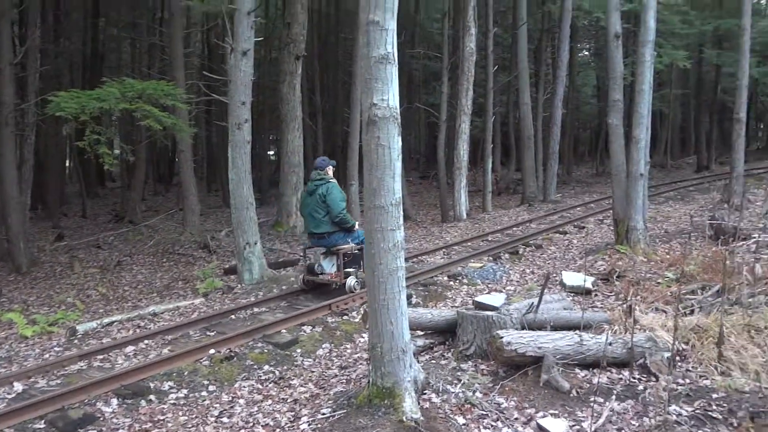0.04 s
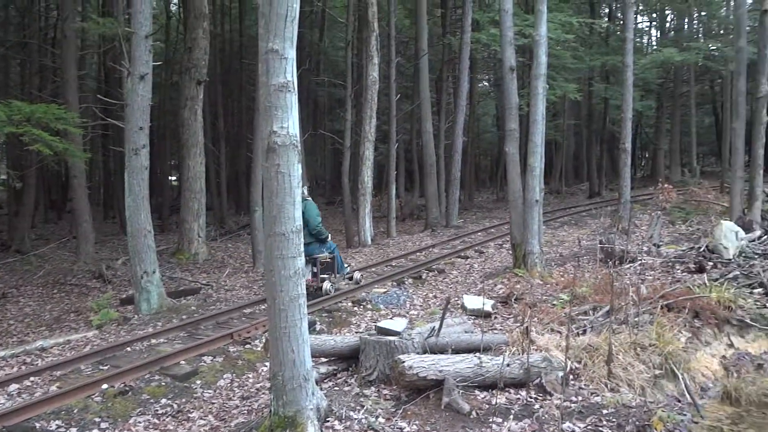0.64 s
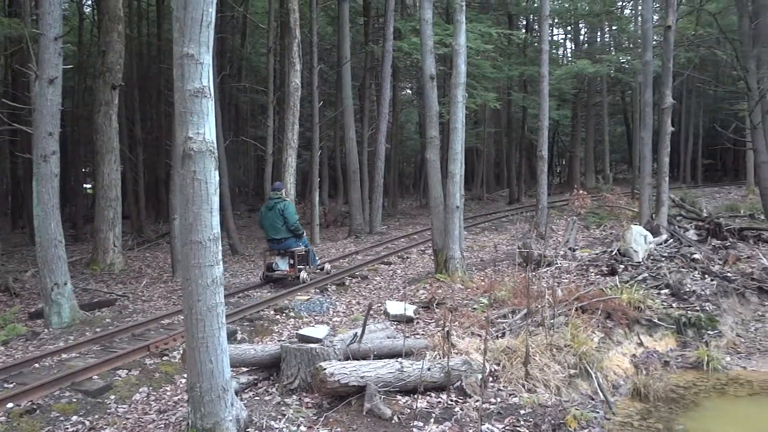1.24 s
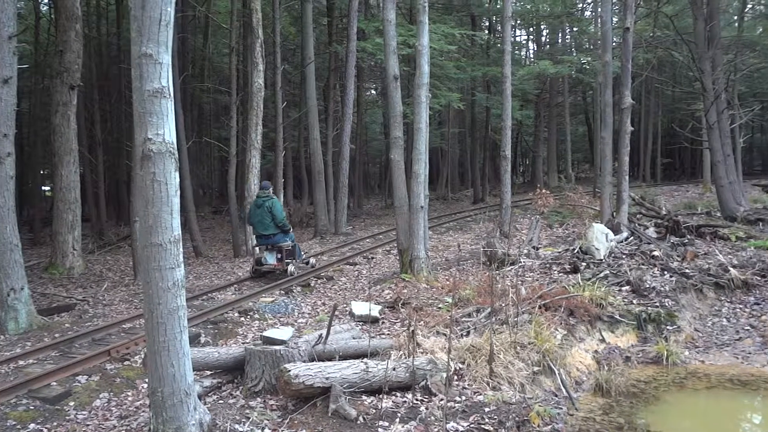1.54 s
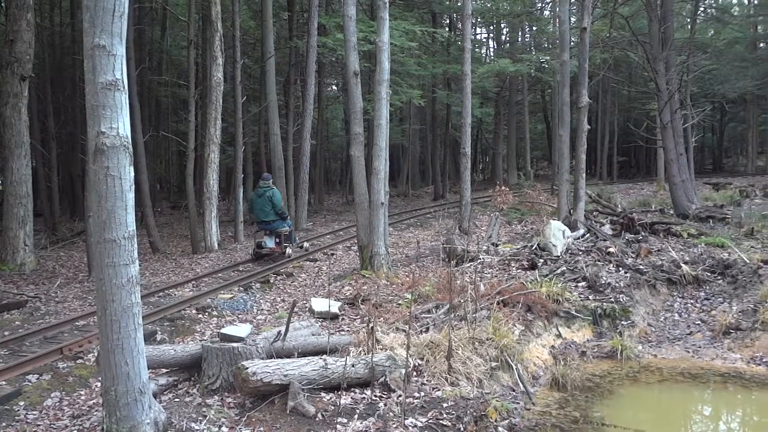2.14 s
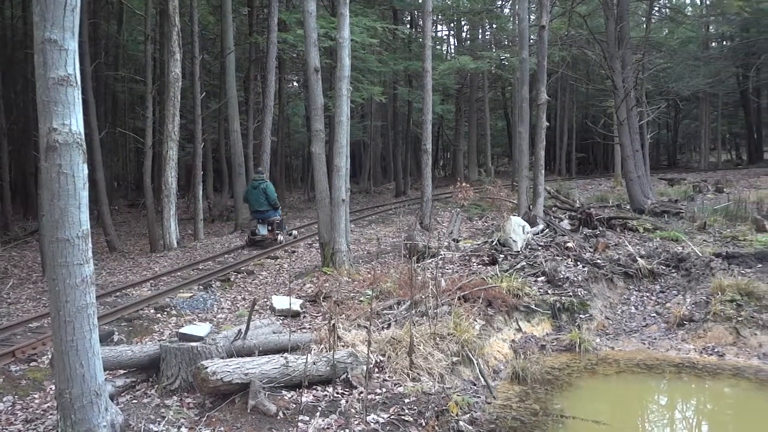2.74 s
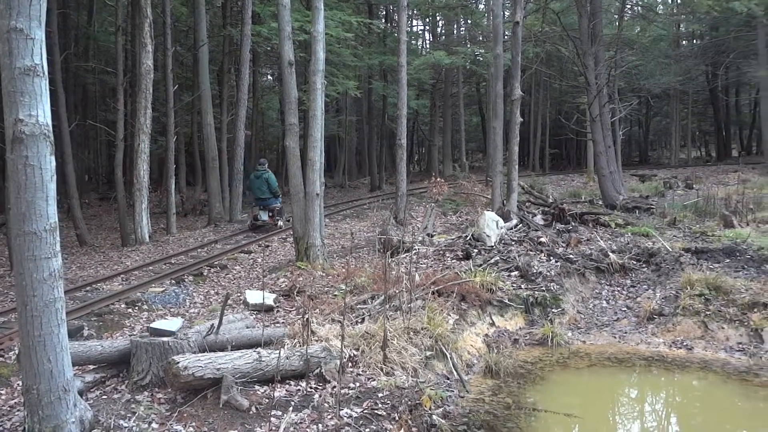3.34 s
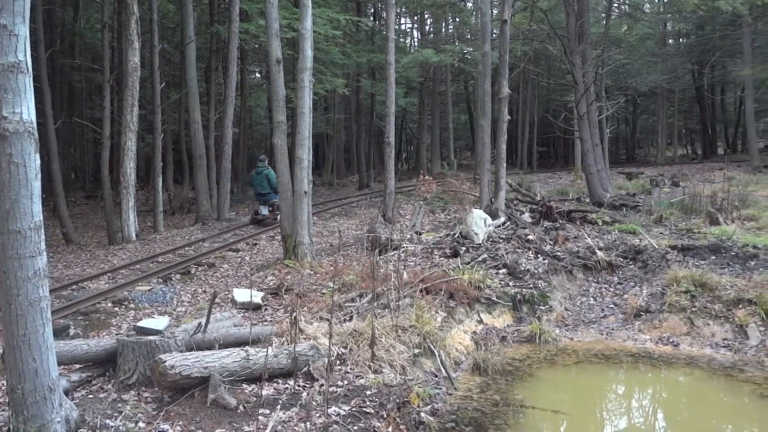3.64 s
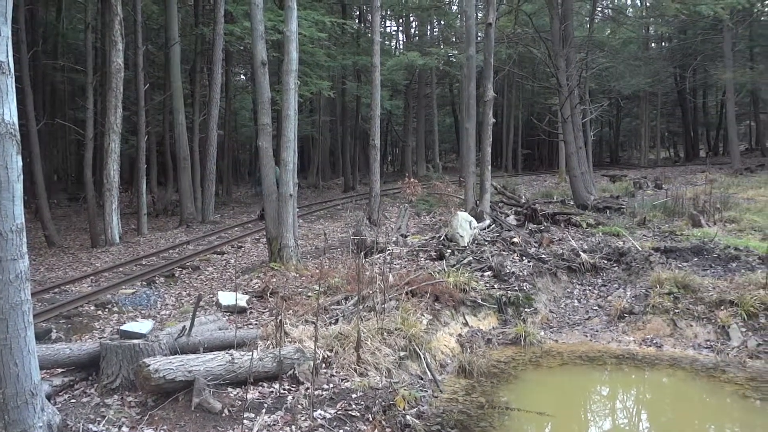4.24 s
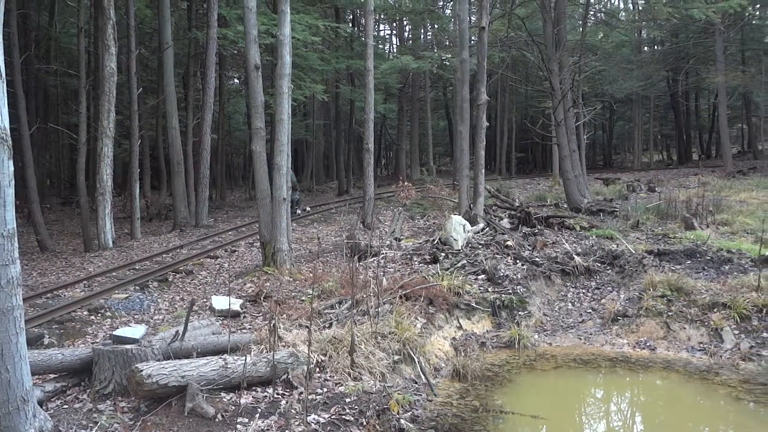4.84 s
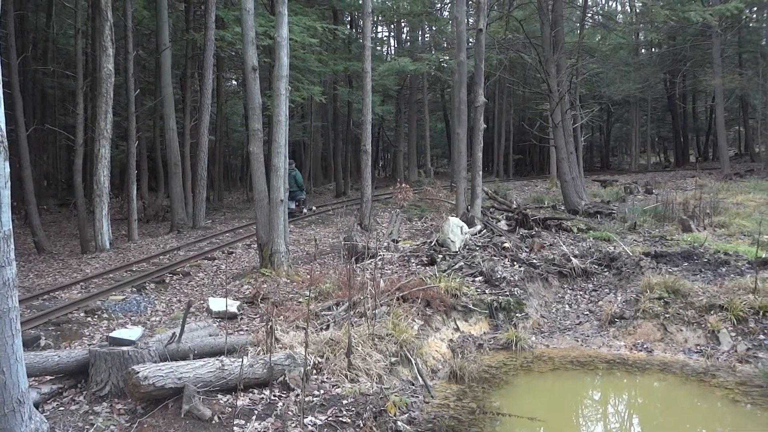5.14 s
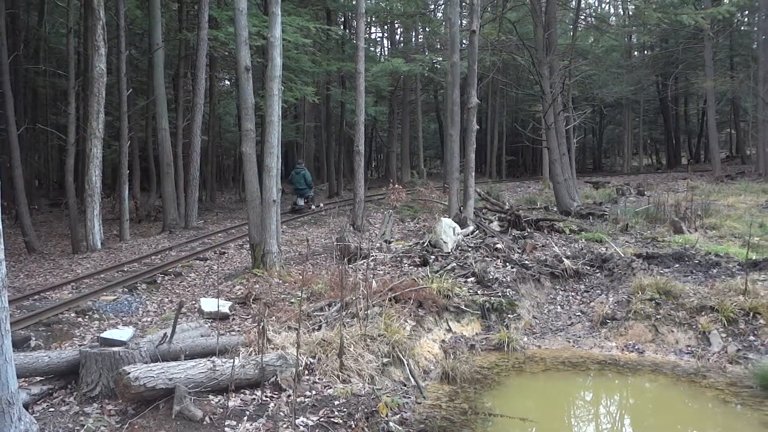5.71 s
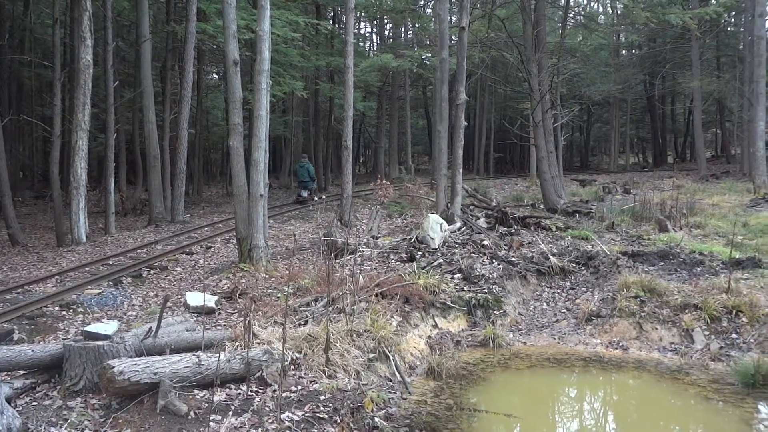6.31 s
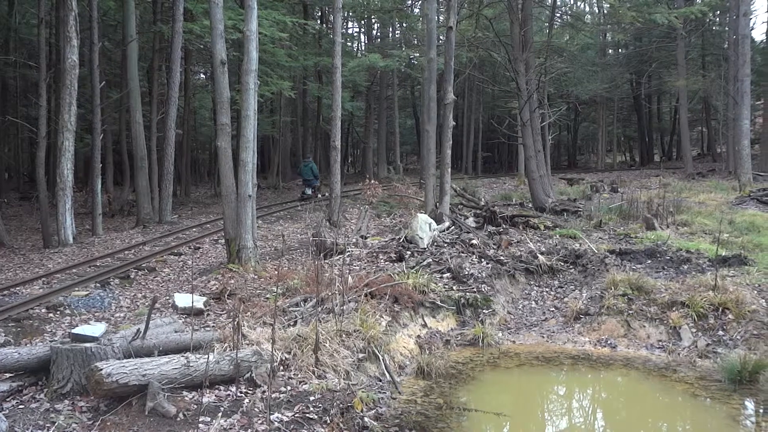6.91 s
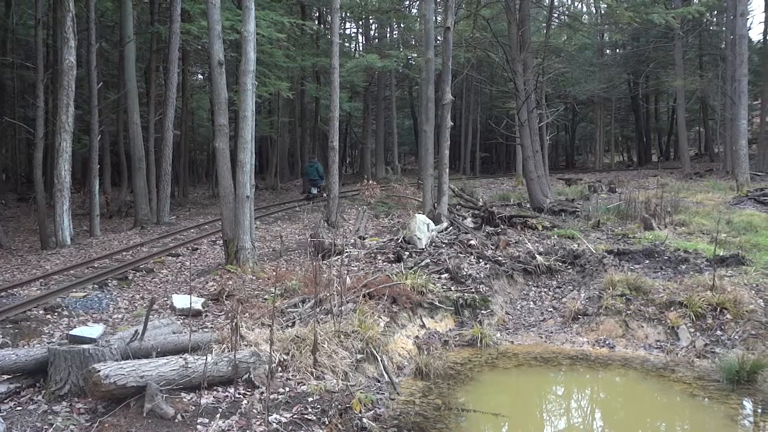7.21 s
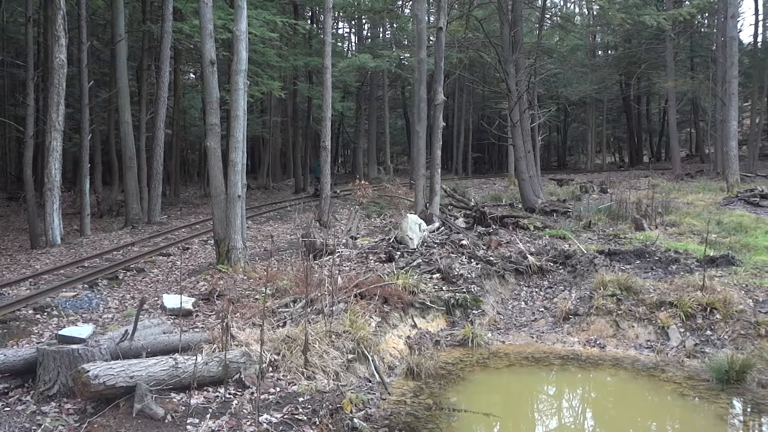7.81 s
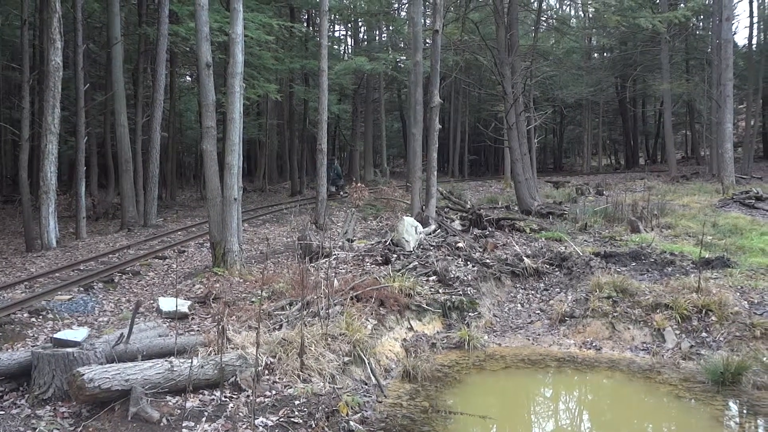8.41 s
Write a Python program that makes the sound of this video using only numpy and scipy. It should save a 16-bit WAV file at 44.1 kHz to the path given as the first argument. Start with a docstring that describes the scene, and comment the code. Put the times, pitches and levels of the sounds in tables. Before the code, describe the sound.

A small cart rolls away along a narrow steel track in quiet woods, its ringing rumble fading as the wheels clack over rail joints.

```python
"""In a wood, a two-port microphone stands 5 m beside a narrow track as a small ride-on cart rolls away.
Rough steel treads make rails, deck and wheels roar and ring. Each rail joint knocks through the steel
first and clatters through the air after it. Pits bump the wheels, the flanges rub in the bend and
loose parts tick; the trunks scatter knocks, clatter and ticks back through the still air."""
import sys
import numpy as np
from scipy import signal
from scipy.fft import rfft, irfft
from scipy.io import wavfile

SR = 44100
rng = np.random.default_rng(int(sys.argv[2]) if len(sys.argv) > 2 else 0)


def inscribe(sig):
    """Save sig as 16-bit PCM at rate SR to the path in sys.argv[1].

    A 1-D sig is mono; a 2-D sig holds one channel per row.
    Samples are clipped to [-1, 1] before scaling.
    """
    pcm = np.round(np.clip(np.atleast_2d(sig).T, -1, 1) * 32767)
    wavfile.write(sys.argv[1], SR, pcm.astype(np.int16))


N = 377496
TIME = np.arange(N) / SR


def from_db(db):
    """Decibels to gain."""
    return 10 ** (np.asarray(db) / 20)

def rms_one(x):
    """Scale to unit power."""
    return x / np.sqrt(np.mean(x ** 2) + 1e-20)

def in_time(points):
    """A table over time, read at every sample."""
    return np.interp(TIME, *np.transpose(points))

def per_bin(points):
    """A table over log frequency, read at every spectral bin."""
    hz, value = np.transpose(points)
    return np.interp(np.log(np.fft.rfftfreq(N, 1 / SR) + 1), np.log(hz), value)

def passage(start, end, edge_s):
    """Rises to 1 around start, holds, and falls around end."""
    return np.clip(np.minimum(TIME - start, end - TIME) / edge_s + .5, 0, 1)

def add(out, s, sound):
    """Mix a sound in at time s."""
    at = max(round(s * SR), 0)
    out[at:at + len(sound)] += sound[:N - at]

def drift(per_s, hop=40):
    """A smooth random curve of spread 1, changing about per_s times a second."""
    pole = np.exp(-2 * np.pi * per_s * hop / SR)
    noise = rng.standard_normal(N // hop + 2002)
    slow = signal.lfilter([1], [1, -2 * pole, pole * pole], noise)[2000:]
    return np.interp(np.arange(N) / hop, np.arange(len(slow)), rms_one(slow))

def low_pass(x, hz, order=2):
    """Dull the treble."""
    return signal.sosfilt(signal.butter(order, min(hz, .45 * SR), fs=SR, output="sos"), x)

def resonate(x, hz, width):
    """A steep resonance: two equal resonators in series, gain 1 on top."""
    radius = np.exp(-np.pi * width / SR)
    gain = (1 - radius ** 2) / 2
    section = [gain, 0, -gain, 1, -2 * radius * np.cos(2 * np.pi * hz / SR), radius ** 2]
    return signal.sosfilt([section] * 2, x + 1e-18)

def rubbed(modes, force):
    """Countless tiny contacts under a common force; each mode picks up its own share of them."""
    return sum(from_db(db) * resonate(force * rng.standard_normal(len(force)), hz, width)
               for hz, width, db in modes)

def wandering(modes, force, waver_db, per_s):
    """The contact wanders over the tread, so each mode swells by itself; unit power."""
    return rms_one(sum(rubbed([mode], force * from_db(waver_db * drift(per_s))) for mode in modes))

def gliding(x, pitch_share, per_s):
    """As the load and the contact point shift, the resonances slide slightly up and down."""
    at = np.arange(N)
    return np.interp((at + np.cumsum(pitch_share * drift(per_s))) % N, at, x)

def jolt(modes, length_s, damping=0.0, uneven_db=0.0, attack_s=.0004, bounces_per_s=130):
    """A burst of contacts, unit power over length_s; damping makes the high modes die first."""
    t = np.arange(SR // 2) / SR
    bounces = from_db(uneven_db * np.clip(drift(bounces_per_s)[:len(t)], -2, 2))
    swell = (1 - np.exp(-t / attack_s)) * bounces
    burst = np.zeros(len(t))
    for hz, width, db in modes:
        decay = np.exp(-(t / length_s * (hz / 1000) ** damping) ** 2)
        burst += rubbed([(hz, width, db)], swell * decay)
    return burst / np.sqrt(np.sum(burst ** 2) / (length_s * SR))


# still air around the microphone: (frequency [Hz], relative density [dB])
AIR_SPECTRUM = [(20, -5), (45, 0), (80, 4.5), (150, 4), (250, 5), (500, 9), (1500, -2), (3000, 3.5),
                (6000, -5), (11000, -10)]
def still_air(level_db=-61):
    """The wood's faint, steady hush."""
    spectrum = rfft(rng.standard_normal(N)) * from_db(per_bin(AIR_SPECTRUM))
    return from_db(level_db) * rms_one(irfft(spectrum, N))

def trunk_echoes(x, t60_s=0.99, build_s=0.0016, leaves_hz=4500, uneven_db=5.0):
    """Trunks return a swarm of echoes of uneven size, dulled by the foliage."""
    t = np.arange(SR) / SR
    swarm = rng.standard_normal(SR) * from_db(uneven_db * rng.standard_normal(SR))
    envelope = (1 - np.exp(-t / build_s)) * from_db(-60 * t / t60_s)
    echoes = low_pass(swarm * envelope, leaves_hz)
    return signal.fftconvolve(x, echoes / np.sqrt(np.sum(echoes ** 2)))[:N]

# phase between the microphone's ports: (frequency [Hz], left lead [rad])
LEFT_LEAD = [(0, 0), (340, 0.7), (1640, 0.96), (2150, 0.93), (2930, 0.72), (4050, 0.21), (5430, 0.66),
             (8350, 0.5), (11000, -0.0), (11800, 0.4)]
# their balance: (frequency [Hz], left over right [dB])
LEFT_LEVEL = [(100, -0.5), (350, 3), (620, 2.5), (1120, .5), (2010, 2.5), (3620, -1.5), (6500, 1.5),
              (11000, 0.5)]
# how alike they sound: (frequency [Hz], coherence [0..1])
COHERENCE = [(120, .82), (300, .96), (600, .99), (1200, .985), (2500, .89), (4500, .93), (10000, .88)]
def microphone(x):
    """Two close ports hear one sound with a shift of phase and level, plus a diffuse share."""
    sides = np.array([[1], [-1]])
    port = from_db(sides * per_bin(LEFT_LEVEL) / 2) * np.exp(sides * .5j * per_bin(LEFT_LEAD))
    direct = rfft(x) * port / np.abs(port.mean(axis=0))
    diffuse = rfft(trunk_echoes(x, t60_s=.35, build_s=.002, leaves_hz=15000))
    alike = per_bin(COHERENCE)
    return irfft(direct + sides * diffuse * np.sqrt((1 - alike) / (1 + alike)), N)

def along_track(s, start_m=0.6, speed_m_per_s=1.85):
    """Metres of rail between the microphone's spot and the cart, which keeps a steady pace."""
    return start_m + speed_m_per_s * s

def distance_db(trackside_m=5.0):
    """Level relative to the start, falling inversely with the way to the track plus the way along it."""
    return -20 * np.log10((trackside_m + along_track(TIME)) / (trackside_m + along_track(0)))

# frame (low) and wheel (high) tones: (start [s], end [s], frequency [Hz], width [Hz], level [dB])
SUNG_TONES = [(3.35, 5.7, 288, 13, -65.5), (1.9, 4.0, 3365, 60, -63), (4.0, 4.5, 3200, 70, -60),
              (4.5, 6.3, 3171, 55, -68.5), (7.8, 8.5, 3190, 55, -70)]
def singing():
    """For a stretch, rolling keeps one lightly damped mode ringing as a faint, unsteady tone."""
    out = np.zeros(N)
    for start, end, hz, width, db in SUNG_TONES:
        tone = wandering([(hz, width, 0)], np.ones(N), waver_db=3.0, per_s=4)
        out += from_db(db) * passage(start, end, edge_s=.2) * tone
    return out

# flange against rail: (frequency [Hz], width [Hz], level [dB])
FLANGE_RESONANCES = [(3750, 250, 0), (4414, 130, 11), (4850, 240, 5.5), (5175, 150, 9), (5500, 220, 0),
                     (6740, 300, -19), (7440, 800, -9), (9450, 810, -17)]
def flange(level_db=-56, waver_db=2.0):
    """Down the track, in the bend, the flange scrapes the rail with a ringing hiss."""
    bend = passage(5.73, 7.16, edge_s=0.47)
    pressure = from_db(waver_db * drift(per_s=25))
    return from_db(level_db) * bend * rms_one(rubbed(FLANGE_RESONANCES, pressure))

# short snaps: loose parts on the cart, a wheel's small rebound just after the first knock, and a high ring
# ending the last joint's clatter: (time [s], level [dB], frequency [Hz], length [s])
SHORT_SNAPS = [(0.138, -30, 1520, 0.0056), (0.158, -36, 3600, 0.0074), (0.219, -41, 4800, 0.0045),
               (0.391, -39, 4950, 0.0037), (1.469, -43, 4240, 0.0051), (2.014, -38.5, 4700, 0.0037),
               (3.113, -49, 5500, 0.0037), (3.613, -49, 2400, 0.038), (4.407, -41, 3780, 0.0045),
               (5.793, -37, 2380, 0.0031), (5.796, -45, 6760, 0.0021), (6.014, -37.5, 7640, 0.0019),
               (6.174, -49.5, 5500, .004), (7.774, -41, 7540, 0.0017), (8.33, -52.5, 7850, 0.042)]
def ticks(relative_width=0.78):
    """Short dry snaps, each with its own pitch: mostly loose parts, plus a wheel's rebound and a clatter's last
    ring."""
    out = np.zeros(N)
    for s, db, hz, length_s in SHORT_SNAPS:
        add(out, s, from_db(db) * jolt([(hz, relative_width * hz, 0)], length_s))
    return out

# pits along the rail: (time [s], peak level [dB])
RAIL_PITS = [(0.505, -14.5), (1.319, -16), (2.784, -17.5), (3.559, -17.5), (4.416, -22), (4.614, -18),
             (5.036, -18.5), (5.434, -22), (5.915, -22), (7.790, -22)]
def pits():
    """A wheel drops into a pit in the rail: one soft push, a short bump."""
    ring = resonate(signal.unit_impulse(SR // 10), hz=880, width=170)
    bump = low_pass(ring, hz=1700, order=4)
    out = np.zeros(N)
    for s, db in RAIL_PITS:
        add(out, s, from_db(db) * bump / np.abs(bump).max())
    return out

# the deck's boom: (frequency [Hz], width [Hz], level [dB])
BOOM_RESONANCES = [(301, 43, -0.5), (358.6, 120, -1.5)]
# its course, heard from the trackside: (time [s], level [dB])
BOOM_LEVEL = [(0, -49), (0.6, -55), (1.1, -60), (1.7, -57.5), (2.0, -50), (2.4, -56.5), (2.75, -63),
              (3.8, -62.5), (4.6, -65.5), (6.0, -66.5), (8.5, -75)]
def deck_boom(bumps):
    """Bumps keep two low modes of the deck booming."""
    return from_db(in_time(BOOM_LEVEL)) * rms_one(rubbed(BOOM_RESONANCES, bumps))

# the wheels' ring: (frequency [Hz], width [Hz], level [dB])
WHEEL_RESONANCES = [(4194, 180, 2.5), (4240, 130, -5.5), (4460, 200, -1.5)]
# its course, heard from the trackside: (time [s], level [dB])
RING_LEVEL = [(0, -43.5), (0.7, -53), (1.25, -50), (1.7, -50.5), (2.6, -51.5), (3.7, -50.5), (4.1, -55.5),
              (4.5, -61), (5.05, -56.5), (5.45, -59), (5.7, -56), (6.2, -54), (6.8, -59), (7.6, -62),
              (8.5, -58.5)]
def wheel_ring(grit):
    """Grit keeps the steel wheels ringing, high and unsteady."""
    ring = wandering(WHEEL_RESONANCES, grit, waver_db=1.7, per_s=7)
    return from_db(in_time(RING_LEVEL)) * gliding(ring, pitch_share=.0055, per_s=7)

# sand on the rail: (frequency [Hz], width [Hz], level [dB])
SAND_BAND = [(7000, 3300, 0)]
def sand(grains_per_s=60, spread_db=6.0):
    """Grains of uneven size crackle under the treads at random moments; unit power."""
    sizes = from_db(-spread_db * np.clip(rng.standard_normal(N), -2, 2))
    crushed = rng.random(N) < grains_per_s / SR
    return rms_one(rubbed(SAND_BAND, sizes * crushed))

# steel treads: (frequency [Hz], width [Hz], level [dB])
TREAD_RESONANCES = [(1637, 440, 10), (2110, 310, -6), (2756, 700, 2), (3247, 330, 2.5), (3690, 660, 2.5),
                    (4300, 800, -3.5), (4965, 530, 0.5), (5320, 400, -3.5), (5740, 600, -7.5),
                    (6370, 380, -5), (6690, 180, -3), (6880, 350, -7), (7480, 470, -6), (8100, 390, -11),
                    (9060, 1100, -12.5), (9820, 210, -8.5), (10240, 370, -13.5), (10780, 180, -9.5)]
# trunks between cart and microphone: (start [s], end [s], loss [dB])
TRUNK_SHADOWS = [(0.412, 1.157, 4.5), (4.02, 5.51, 3), (7.2, 8.5, 1)]
def tread_hiss(grit, base_db=-40, distance_power=1.65):
    """The treads hiss on grit and sand; trunks shade this treble as the cart passes behind them."""
    hiss = wandering(TREAD_RESONANCES, grit, waver_db=1.8, per_s=6) + from_db(-23) * sand()
    shade_db = sum(loss * passage(start, end, edge_s=0.32) for start, end, loss in TRUNK_SHADOWS)
    return from_db(base_db + distance_power * distance_db() - shade_db) * hiss

# the cart's deck: (frequency [Hz], width [Hz], level [dB])
DECK_RESONANCES = [(209, 570, -29.5), (392, 140, -22.5), (506, 64, -4.5), (584.3, 61, 2), (625, 103, 4)]
def deck_rumble(bumps, rough_db, base_db=-29, distance_power=2.005):
    """The deck rumbles hard on rough rail and fades quickly with distance."""
    level_db = base_db + distance_power * distance_db() + 1.73 * rough_db
    return from_db(level_db) * rms_one(rubbed(DECK_RESONANCES, bumps))

# the rails: (frequency [Hz], width [Hz], level [dB])
RAIL_RESONANCES = [(668, 96, -5.5), (754.3, 69, 2), (822, 54, 2), (882.6, 57, 0.5), (953, 70.5, 1.5),
                   (1033, 57, -4), (1170, 165, -7), (1343, 180, -10.5), (1635, 81, -18), (1872, 55, -27),
                   (2130, 380, -34.5)]
def rail_roar(bumps, rough_db, base_db=-25, distance_power=0.8):
    """The rails roar under the wheels and carry the sound far back toward the microphone."""
    roar = wandering(RAIL_RESONANCES, bumps, waver_db=1.5, per_s=1.46)
    level_db = base_db + distance_power * distance_db() + 0.46 * rough_db
    return from_db(level_db) * gliding(roar, pitch_share=.008, per_s=2)

# rail surface under the wheels: (time [s], relative roughness [dB])
RAIL_ROUGHNESS = [(0.0, -0.5), (1.3, -1.15), (2.4, 2.5), (2.9, -2.5), (3.1, 2.7), (3.2, -6.5), (3.3, -1),
                  (3.6, 3), (4.2, 4), (4.4, 0.7), (4.6, 2), (5.2, 3.5), (5.6, 1.5), (5.8, 0), (6.5, 2),
                  (6.6, -1), (6.9, 3.5), (7.0, -2.5), (8.5, 1)]
def rolling(bump_db=1.0, grit_db=0.5):
    """Rust and pits shake deck, rails and wheels together; the high modes feel the finer grit too."""
    rough_db = in_time(RAIL_ROUGHNESS)
    bumps = from_db(bump_db * drift(per_s=22))
    grit = np.sqrt(bumps) * from_db(grit_db * drift(per_s=90))
    return (rail_roar(bumps, rough_db) + tread_hiss(grit) + deck_rumble(bumps, rough_db)
            + deck_boom(bumps) + wheel_ring(grit))

def chime(hz, split_hz=64, twin_db=-15.5, rise_s=.005, t60_s=.24):
    """A struck wheel rings on in a pair of close modes that beat."""
    t = np.arange(SR // 2) / SR
    twin = from_db(twin_db) * np.sin(2 * np.pi * ((hz + split_hz) * t + rng.random()))
    pair = rms_one(np.sin(2 * np.pi * hz * t) + twin)
    return pair * (1 - np.exp(-t / rise_s)) * from_db(-60 * t / t60_s)

# loose metal: (frequency [Hz], width [Hz], level [dB])
METAL_RESONANCES = [(358, 330, -1.5), (1410, 1120, 6), (2270, 350, 3), (2680, 250, -1), (3200, 610, 1),
                    (3600, 730, -4), (4177, 180, 7.5), (4560, 380, -2), (4610, 450, -2.5),
                    (5360, 230, -2.5), (5900, 3700, -10.5), (6680, 110, -5), (7650, 1500, -22),
                    (9600, 420, -10.5), (9500, 220, -7), (10200, 1200, -12)]
def clatter(length_s, settling_s, top_hz, rise_s=.002):
    """Loose parts lift off one after another, then settle in uneven bounces."""
    lift = jolt(METAL_RESONANCES, length_s, attack_s=rise_s)
    settling = jolt(METAL_RESONANCES, settling_s, uneven_db=4.5, attack_s=rise_s)
    return low_pass(lift + from_db(-9) * settling, top_hz)

# deck on its axles: (frequency [Hz], width [Hz], level [dB])
AXLE_RESONANCES = [(125, 210, -27), (338, 64, -4)]
def thump(length_s):
    """A blow makes the deck thump on its axles."""
    return jolt(AXLE_RESONANCES, length_s)

# wheel on rail end: (frequency [Hz], width [Hz], level [dB])
CLACK_RESONANCES = [(326, 160, -21), (637, 156, -1), (754, 150, 1), (967, 330, 2), (1165, 160, -5),
                    (1340, 220, -0.5), (1587, 170, -5), (1900, 500, -16.5), (2630, 190, -14.5),
                    (2930, 250, -20), (3450, 290, -24.5), (4410, 340, -17)]
def clack(centre_hz, length_s, off_centre_db=5.5):
    """A wheel knocks dully on the rail end, favouring the modes near centre_hz."""
    struck = [(hz, width, db - off_centre_db * np.log2(hz / centre_hz) ** 2)
              for hz, width, db in CLACK_RESONANCES]
    return jolt(struck, length_s, damping=.25)

def through_rail(knock, metres, fastest_hz=1350, fastest_m_per_s=640):
    """Higher bending waves run faster, so a far knock arrives bright first and dull a moment later."""
    hz = np.clip(np.fft.rfftfreq(len(knock), 1 / SR), 300, fastest_hz)
    travel_s = metres / (fastest_m_per_s * np.sqrt(hz / fastest_hz))
    phase = 2 * np.pi * np.cumsum(travel_s - travel_s.min()) * SR / len(knock)
    return irfft(rfft(knock) * np.exp(-1j * phase), len(knock))

# a wheel crosses a joint, each time farther from the microphone:
# (time [s], knock [dB], knock length [s], knock centre [Hz], thud [dB], thud centre [Hz], thump [dB],
#  clatter [dB], clatter length [s], clatter top [Hz], settling [s], chime [dB], chime pitch [Hz])
RAIL_JOINTS = [(0.05, -18.5, 0.017, 2200, -39, 1040, -58, -25, 0.016, 8850, 0.11, -44, 4180),
               (2.538, -20.5, 0.017, 1590, -21.5, 1160, -46, -29.5, 0.012, 7040, 0.075, -38, 4190),
               (2.858, -20.5, 0.017, 1580, -20.5, 1330, -50, -33, 0.042, 4800, 0.12, -44, 4180),
               (3.803, -18, 0.022, 1410, -29, 950, -46, -30.5, 0.008, 7000, 0.056, -46, 4160),
               (4.131, -16, 0.02, 1300, -25, 900, -50.5, -33.5, 0.013, 5960, 0.088, -47, 3310),
               (6.966, -26, 0.045, 1570, -29.5, 890, -57, -34.5, 0.015, 5500, 0.071, -45.5, 2415),
               (8.264, -19.5, 0.033, 1400, -28, 900, -74, -37, 0.014, 10500, 0.069, -47, 4220)]
def joints(thud_s=0.024, sound_m_per_s=343):
    """Each blow arrives twice: at once through the steel, then by air as thud, thump, clatter, chime."""
    dull, bright = np.zeros(N), np.zeros(N)
    for (s, knock_db, knock_s, knock_hz, thud_db, thud_hz, thump_db,
         clatter_db, clatter_s, top_hz, settling_s, chime_db, chime_hz) in RAIL_JOINTS:
        metres = along_track(s)
        by_air = s + metres / sound_m_per_s
        add(dull, s, from_db(knock_db) * through_rail(clack(knock_hz, knock_s), metres))
        add(dull, by_air, from_db(thud_db) * clack(thud_hz, thud_s))
        add(dull, by_air, from_db(thump_db) * thump(thud_s))
        add(bright, by_air, from_db(clatter_db) * clatter(clatter_s, settling_s, top_hz))
        add(bright, by_air, from_db(chime_db) * chime(chime_hz))
    return dull, bright


def scene(near_echo_db=-17.5, far_echo_db=-4.0):
    """The farther the cart, the more echo; trunks scatter bright clatter far more than dull knocks."""
    knocks, rattle = joints()
    snaps = ticks()
    scattered = trunk_echoes(rattle + from_db(-14) * knocks + from_db(-2.5) * snaps)
    echo = from_db(np.linspace(near_echo_db, far_echo_db, N)) * scattered
    air = still_air()
    cart = rolling() + singing() + pits() + flange() + knocks + rattle + snaps
    return microphone(air + echo + cart)

def record(dry):
    """The treble is cut steeply above 11150 Hz."""
    return signal.sosfilt(signal.ellip(12, .1, 80, 11150, fs=SR, output="sos"), dry)


dry = scene()
out = record(dry)
inscribe(out)
```